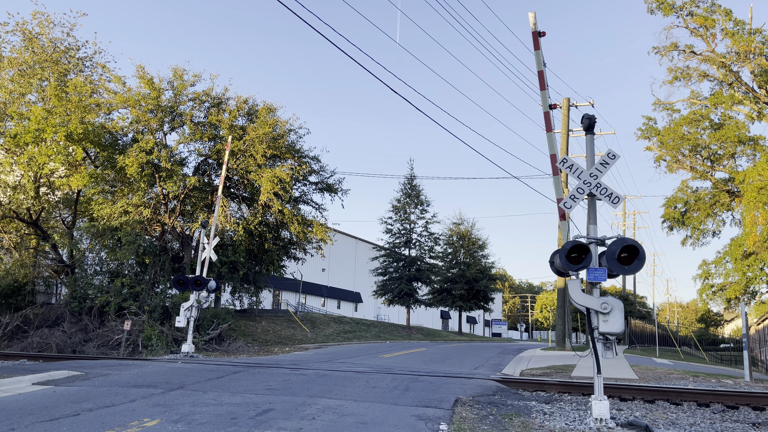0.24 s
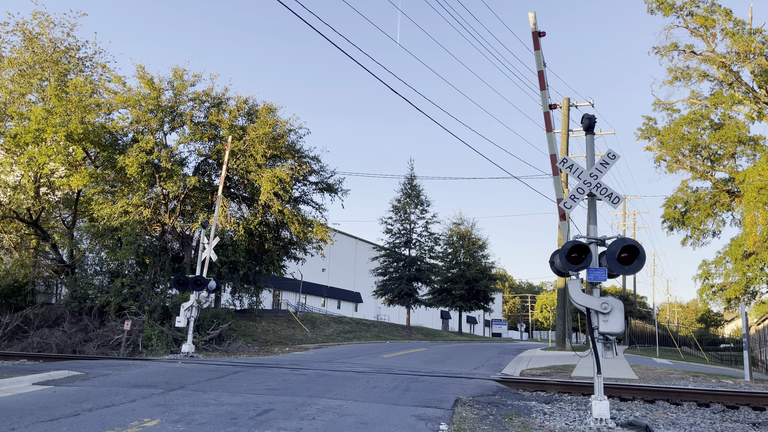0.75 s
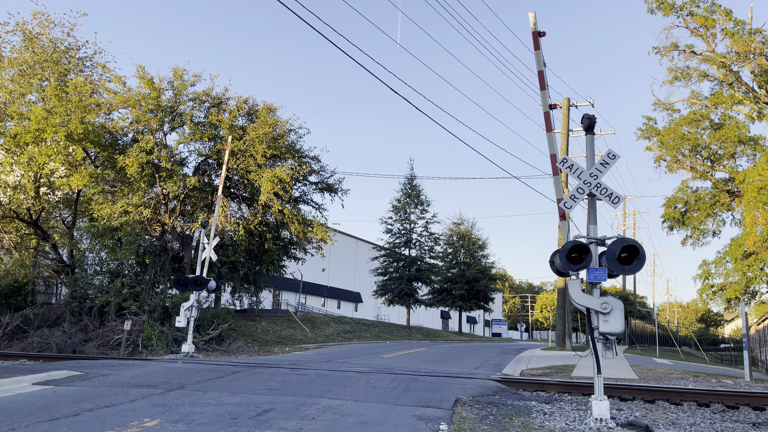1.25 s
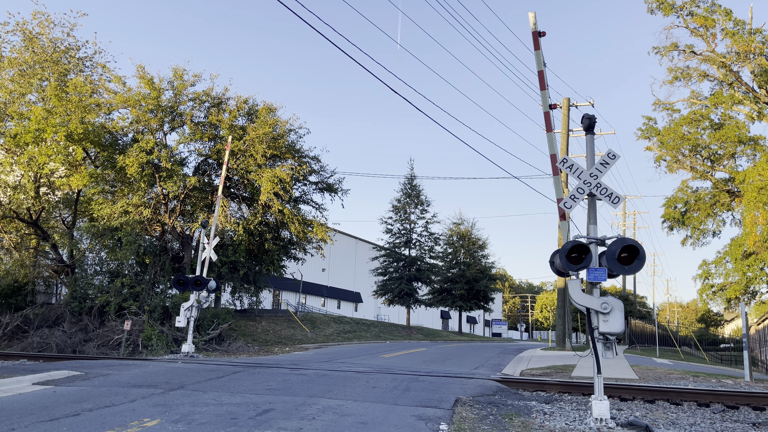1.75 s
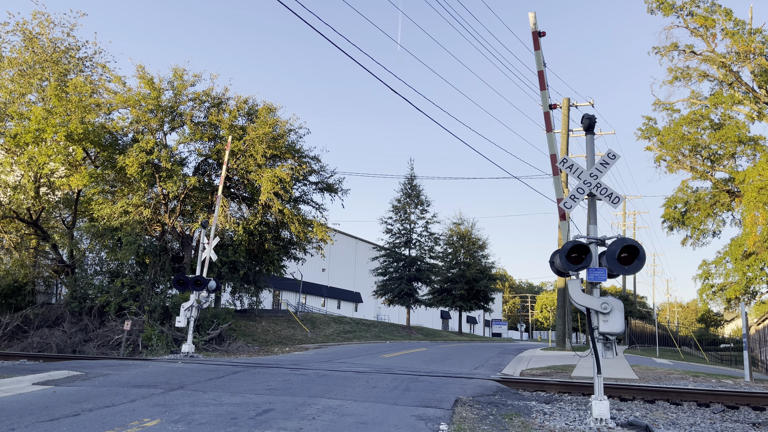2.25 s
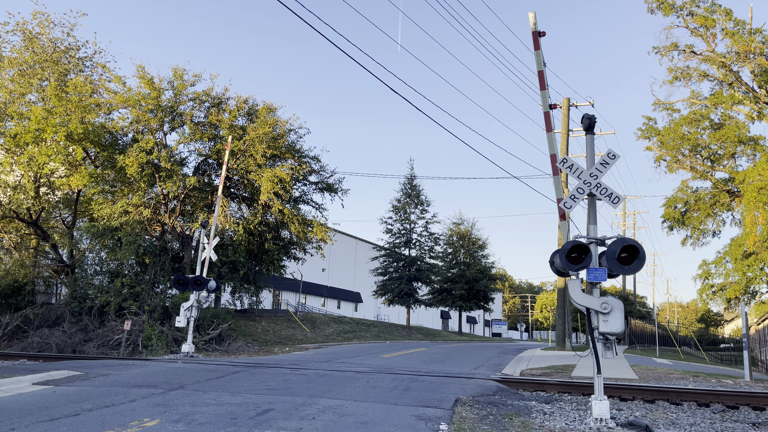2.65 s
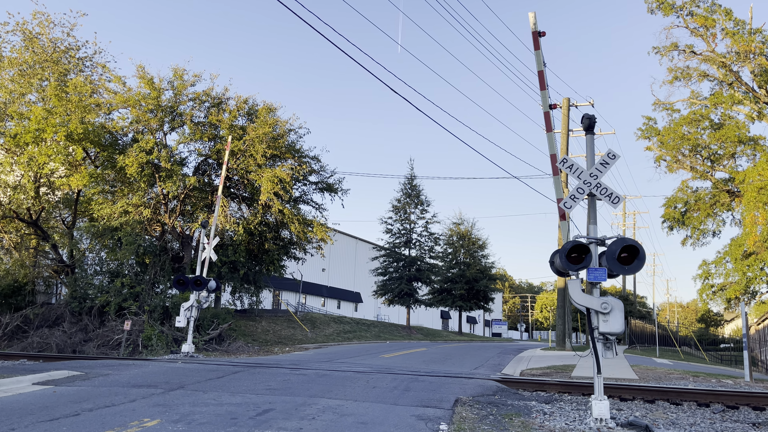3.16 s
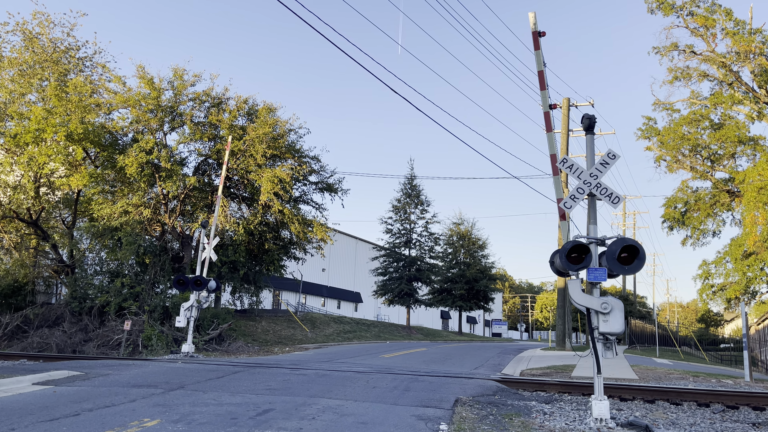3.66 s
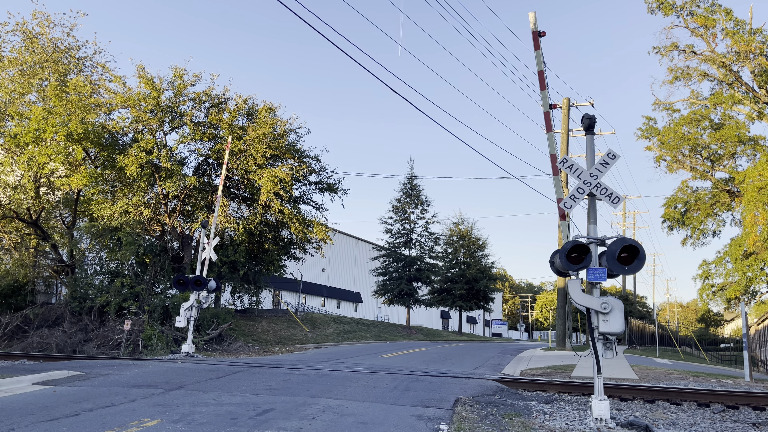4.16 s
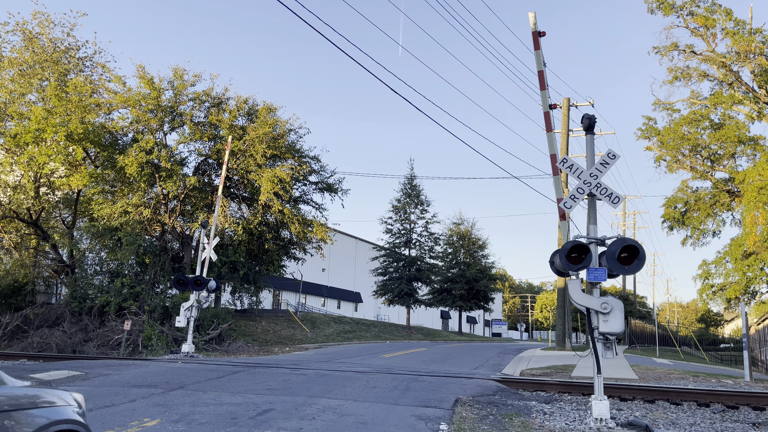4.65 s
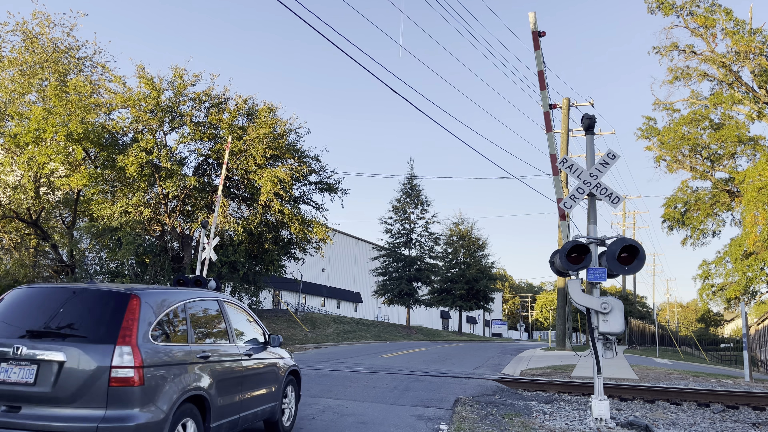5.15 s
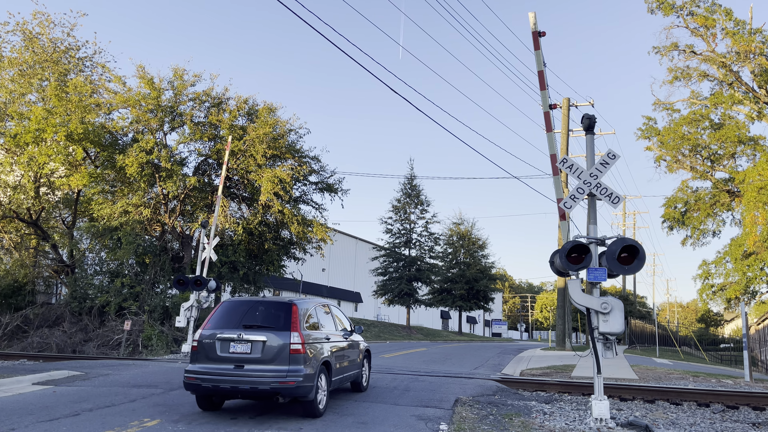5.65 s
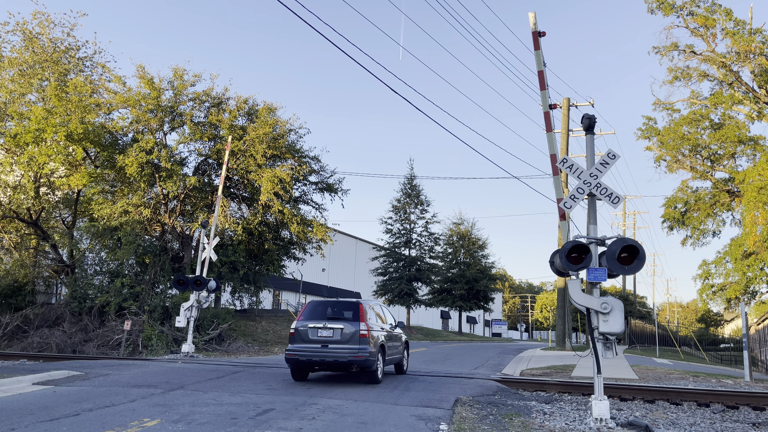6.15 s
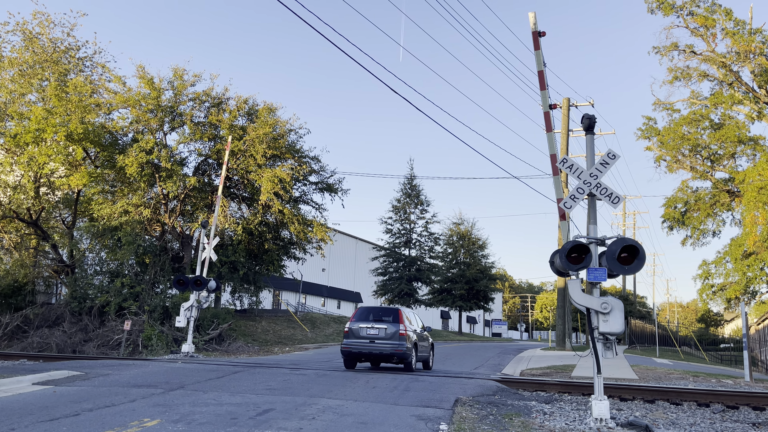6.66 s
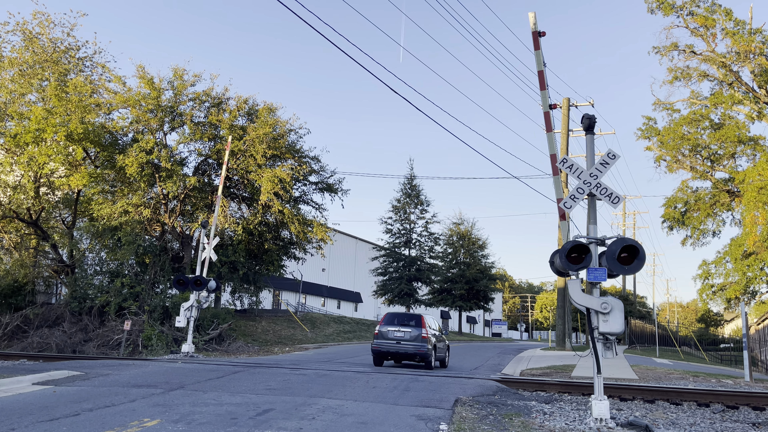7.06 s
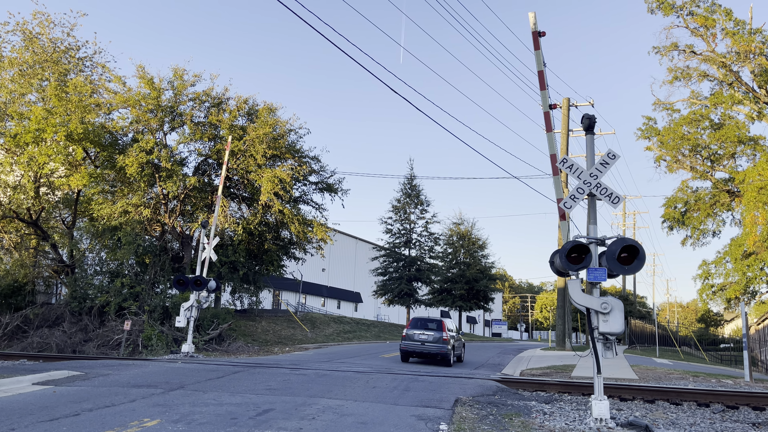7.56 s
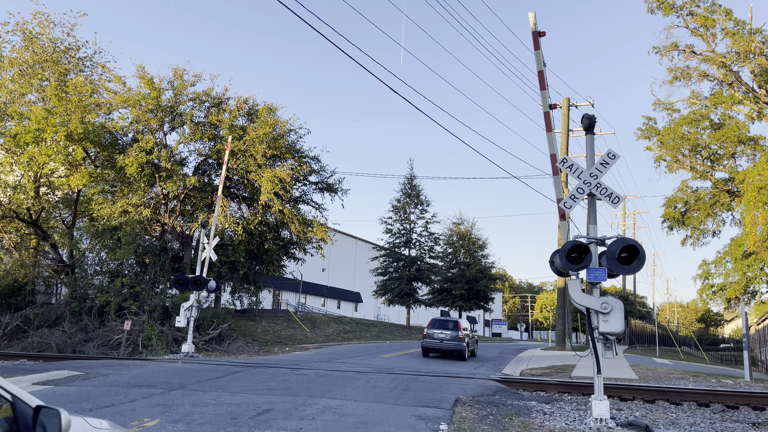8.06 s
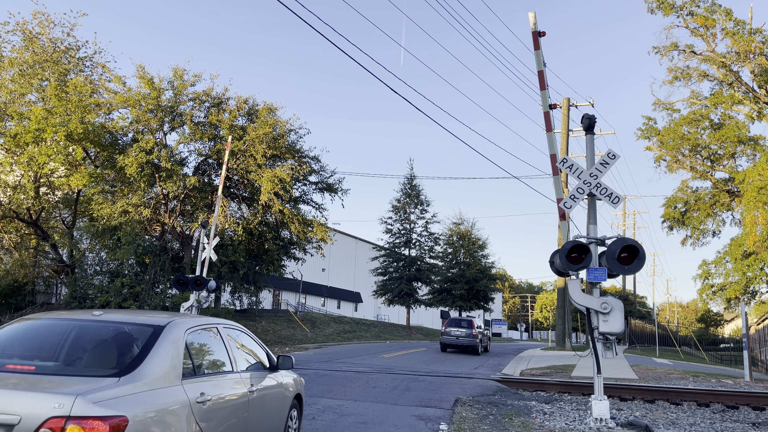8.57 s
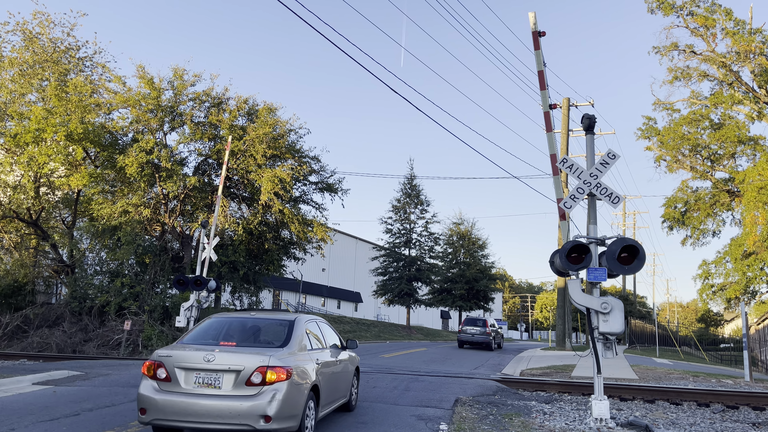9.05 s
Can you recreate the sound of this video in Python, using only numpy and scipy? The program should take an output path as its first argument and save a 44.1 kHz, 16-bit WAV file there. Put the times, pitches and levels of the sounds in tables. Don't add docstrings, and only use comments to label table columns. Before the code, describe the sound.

Low engine hum and distant road wash; a car roars by and clatters across railway tracks, a second follows as a bird chirps.

```python
import sys
import numpy as np
from scipy import signal
from scipy.fft import rfft, irfft, next_fast_len
from scipy.io import wavfile

SR = 44100
rng = np.random.default_rng(int(sys.argv[2]) if len(sys.argv) > 2 else 0)


def natural_amplitude(level_db):
    exponent = np.asarray(level_db, float) / 20
    return 10 ** exponent


def put_to_file(sound):
    columns = np.atleast_2d(sound).T
    safe = np.clip(columns, -1, 1)
    whole_steps = np.round(safe * 32767)
    wavfile.write(sys.argv[1], SR, whole_steps.astype(np.int16))


N = 410571
T, SIZE = np.arange(N) / SR, next_fast_len(N)
HZ = np.fft.rfftfreq(SIZE, 1 / SR)

# (frequency [Hz], density [dB per Hz])
FAR_COLOUR = [(45, 8), (160, -11.5), (350, -14), (600, -18), (900, -14), (1650, -18), (2200, -24.5),
              (4000, -39), (5400, -46), (6500, -46), (8200, -58.5), (10000, -60), (11200, -59),
              (12300, -63)]
BEHIND_COLOUR = [(45, 20.5), (160, -2), (350, -3.5), (600, -4.5), (900, 0.5), (1650, -5), (2150, -20),
                 (2650, -29), (3400, -28), (5300, -33), (6600, -33.5), (9000, -44), (11000, -46),
                 (11700, -57), (12000, -78)]
ABEAM_COLOUR = [(45, 18), (160, -6.5), (350, -8.5), (600, -12), (900, 0.5), (1650, -8), (2200, -22),
                (3300, -33), (5000, -31), (6500, -34), (8500, -43), (11000, -45), (11800, -46),
                (12500, -51.5)]
AHEAD_COLOUR = [(45, 12), (160, -5), (350, -9), (600, -14.5), (900, -7.5), (1650, -9.5), (2200, -24.5),
                (4000, -35), (5500, -26.5), (6500, -31.5), (8300, -41), (11000, -45), (11750, -57),
                (12100, -57)]
# (frequency [Hz], left leads [rad], likeness [0-1], left over right [dB])
FAR_PORTS = [(45, .1, .99, 1.6), (350, .8, .6, 2.5), (600, 2.6, .55, 4), (900, 1.8, .22, 4.5),
             (1500, 1.8, .55, 1), (2300, 3.1, .3, 2.5), (3000, 3.8, .48, 4), (4400, 5.8, .45, 7),
             (5200, 8.8, .07, 10), (6300, 8.8, .25, 13), (8700, 0, .2, 11), (9700, 0, .65, 1),
             (10200, 0, .88, 0), (11400, 0, .7, 0)]
BEHIND_PORTS = [(45, .1, .99, 1.8), (350, 1.8, .75, 4.3), (700, 2.6, .88, 4.7), (1200, 3.1, .75, 7),
                (1600, 2.8, .4, 6), (2050, 3.6, .25, 4), (2600, 6, .45, 2.5), (3600, 8.8, .55, 4),
                (4400, 10.2, .3, 5), (5300, 11.3, .35, 5), (6500, 17, .08, 11), (8500, 0, .4, 10),
                (9200, 0, .6, 1), (10000, 0, 1, 0), (11400, 0, .85, .5)]
ABEAM_PORTS = [(45, .1, .99, 1.6), (350, .9, .78, 5), (700, 2.1, .8, 7), (950, 2.2, .62, 5.5),
               (1250, 2.9, .82, 3), (1550, 2.8, .15, 5.5), (2250, 4, .62, 1.5), (2900, 4.2, .2, 5),
               (3400, 7.2, .3, 4), (5100, 6.3, .08, 12), (6600, 7, .3, 11), (8000, 0, .45, 2.5),
               (8800, 0, .85, 1), (10000, 0, 1, 0), (11400, 0, .87, .5)]
AHEAD_PORTS = [(45, .1, .99, 1.6), (350, .4, .78, 2.6), (650, .6, .25, 5), (950, .9, .52, 3),
               (1250, 1.2, .3, 6.5), (1600, .9, .68, 2), (1850, 1.8, .6, -1.5), (2250, 1.8, .25, 3),
               (2600, 1.8, .6, .5), (4000, 4.5, .1, 4.5), (5400, 9.6, .47, 10), (6100, 11, .1, 9),
               (8200, 0, .55, 3), (8800, 0, .92, 1), (10000, 0, 1, 0), (11400, 0, .87, .3)]
# (frequency [Hz], left leads [rad])
TREBLE_LEAD = [(6200, 2.2), (6600, .3), (7050, -np.pi), (7700, -5.6), (8700, -6.6), (9850, -3 * np.pi),
               (10330, -3 * np.pi), (11700, -4 * np.pi)]
# (frequency [Hz], width [Hz], depth [dB])
HOUSING_DIPS = [(1120, 59, -3), (1933, 410, -7), (4120, 440, -4.5), (5270, 170, -2.5)]

# (time [s], bearing [-1 far off, 0 behind, 1 abeam, 2 ahead], closeness [dB])
NEAREST_CAR = [(0, -1.1, -11.5), (2.0, -0.86, -11.5), (2.8, -0.46, -9), (3.4, 0.07, -4.5),
               (3.8, -0.3, -1.5), (4.2, 0.53, 0), (4.45, 0.5, 1), (4.7, 1.26, 0.4), (5.2, 1.7, -1.2),
               (5.7, 2, -2.5), (6.3, 1.76, -3.5), (6.7, 1.05, -3.5), (7.0, 0.14, -3), (7.6, 0.22, 1),
               (8.05, 0.9, 1.14), (8.5, 1.73, -1), (8.9, 2.5, -3), (9.31, 2.33, -4)]
LAYER_EDGES_HZ = [180, 650, 1900, 4200, 10100]
# (share of the closeness swing, far off [dB], behind [dB], abeam [dB], ahead [dB])
RUMBLE, ROAR = (0.1, -42.5, -42.5, -39, -41), (0.6637, -40.5, -44.5, -38.5, -41)
TREAD, WASH = (0.83, -37.5, -42.5, -42, -41.5), (0.9151, -53, -50, -50, -52.5)
HISS, FIZZ = (0.69, -63, -57, -57, -62), (4, -83, -66.5, -53, -51.5)

# (time [s], peak level [dB], pitch [Hz])
RAIL_THUMPS = [(5.58, -30, 404), (5.603, -25.5, 179), (5.626, -25, 105), (5.925, -26, 179),
               (5.987, -33, 153), (6.207, -22.5, 209), (6.244, -21, 207), (6.2562, -15, 120),
               (6.274, -29, 121), (6.2892, -18.5, 108), (6.325, -25, 100), (6.437, -20, 115),
               (6.489, -21.5, 117), (6.583, -25, 170), (6.6099, -18, 170), (6.666, -21, 94.5),
               (6.7968, -19.5, 160), (6.834, -21.5, 93)]
# (time [s], peak level
# [dB], pitch [Hz])
PANEL_KNOCKS = [(5.58, -30, 800), (5.58, -27, 1380), (5.937, -32, 620), (5.611, -32, 1420),
                (5.595, -31, 850), (6.425, -32, 1400), (5.581, -32, 520), (6.2045, -27.5, 1500),
                (6.2045, -26, 850), (6.22, -29, 1250), (6.246, -27.5, 1550), (6.2482, -23, 800),
                (6.239, -32, 870), (6.2797, -25.5, 900), (6.572, -34, 280), (6.213, -32, 250),
                (6.417, -30, 1550), (6.419, -22.5, 410), (6.441, -23.5, 330), (6.486, -27, 855),
                (6.486, -35, 1750), (6.495, -28, 1420), (6.493, -27, 290), (6.566, -24.5, 335),
                (6.581, -27.5, 1330), (6.6068, -27, 1500), (6.6065, -21, 418), (6.61, -27, 760),
                (6.637, -24, 438), (6.638, -31, 1300), (6.783, -23, 397), (6.799, -33, 495),
                (6.806, -33, 1450), (6.851, -30, 860), (6.805, -27, 330), (6.853, -24.5, 270),
                (9.2538, -24, 1300), (9.2538, -33, 746)]
# (time [s], firing rate [Hz], first order level [dB])
FIRST_CAR_ENGINE = [
    (2.6, 41.5, -60),
    (3.3, 41, -52),
    (4.0, 40, -51),
    (4.5, 38.5, -43),
    (5.0, 37, -44),
    (6.1, 35, -53),
    (6.6, 33.5, -55),
    (7.3, 30, -59),
    (7.7, 29, -72),
]
SECOND_CAR_ENGINE = [
    (7.0, 37.3, -88),
    (7.6, 32.9, -43),
    (8.1, 32.1, -45),
    (8.6, 31.25, -43.5),
    (9.31, 29.1, -59),
]

# (time [s], length
# [s], frequency [Hz], width [Hz], level [dB])
WAKES = [(3.9, 0.35, 1620, 280, -49.5), (4.45, 0.32, 2300, 450, -48), (4.45, .4, 3250, 420, -59),
         (4.4, 0.16, 900, 240, -48), (4.55, 0.58, 1680, 270, -47.5), (5.15, 0.72, 1450, 210, -44),
         (4.9, 0.62, 870, 240, -44), (4.8, 0.12, 860, 170, -48), (7.25, 0.23, 1620, 250, -47.5),
         (6.9, 0.19, 850, 160, -45), (7.6, 0.28, 2350, 430, -52), (7.8, 0.32, 3100, 370, -56),
         (7.79, .2, 1100, 250, -46), (5.65, .2, 880, 200, -53), (8.05, 0.23, 870, 180, -51),
         (8.4, 0.28, 950, 120, -47), (8.15, 0.41, 1720, 290, -48.5), (8.6, 0.39, 1500, 180, -51),
         (7.85, 0.24, 160, 9.1, -44.5), (7.6, 0.62, 78, 5.4, -43.5), (7.1, .25, 11200, 900, -69),
         (4.6, .3, 3200, 500, -60), (9.1, .4, 2350, 300, -61), (8.25, 0.28, 330, 100, -50),
         (8.9, 0.73, 11300, 1200, -66)]
# (time [s], length [s], frequency [Hz], width [Hz], level [dB])
BEAMS = [(3.9, .4, 6600, 500, -60), (4.1, .4, 4400, 500, -60), (4.75, .4, 5000, 400, -63),
         (4.55, .2, 450, 170, -48), (7.3, .45, 6600, 500, -60), (7.4, .3, 3400, 500, -58),
         (7.75, .25, 580, 150, -43), (8.05, .5, 5200, 450, -59), (4.13, .15, 1020, 200, -47),
         (4.45, .2, 930, 220, -45), (7.5, .3, 900, 250, -46), (7.8, .25, 1150, 300, -45)]
# (time [s], length [s], frequency [Hz], width [Hz], level
# [dB])
GLANCES = [(2.75, .4, 700, 220, -52), (1.75, 0.36, 650, 250, -53), (3.1, .3, 3350, 400, -60),
           (3.75, .2, 5100, 500, -64), (4.25, .3, 2000, 300, -51), (4.7, 0.27, 4350, 600, -61),
           (4.75, .35, 4200, 500, -60), (4.68, .08, 3100, 400, -54), (5.45, .35, 750, 250, -49),
           (7.1, .3, 1850, 230, -53), (7.3, .25, 88, 11, -43), (7.55, 0.36, 152, 22, -47.5),
           (7.72, 0.16, 520, 145, -45), (7.91, .1, 520, 200, -42), (7.7, .4, 1950, 350, -49),
           (9, .12, 3000, 700, -57), (8.95, .7, 2300, 230, -58.5), (7.07, 0.22, 280, 68, -49),
           (6.58, .15, 400, 170, -46), (6.5, .15, 150, 55, -45), (3.78, .2, 10900, 700, -76),
           (7.4, .15, 2150, 250, -54), (7.85, .25, 3500, 500, -60), (4.4, .15, 2100, 250, -53),
           (5.65, .3, 850, 300, -50), (7.12, .25, 3600, 400, -63), (8.0, .6, 12100, 500, -80),
           (9, .12, 65.3, 5.3, -39)]

# (time [s], peak level [dB])
STONE_SNAPS = [
    (2.028, -23),
    (2.546, -37),
    (2.569, -22),
    (3.633, -27),
    (3.745, -28),
    (3.751, -22),
    (4.971, -52),
    (8.291, -21),
]
# (time [s], peak level [dB], pitch [Hz])
GRIT_TICKS = [(0.4015, -45.5, 6760), (0.5584, -58, 8200), (0.4045, -50, 5600), (0.403, -56, 9000),
              (2.5474, -56, 7770), (5.896, -34, 11100), (5.9918, -44, 11000), (6.5485, -48, 6090),
              (6.5964, -49, 5680), (6.013, -44, 11300), (6.188, -50, 8500), (6.192, -43, 11000),
              (6.198, -45, 11500), (6.432, -47, 10600), (6.549, -43, 11200), (6.811, -47, 11300)]
# (time [s], length [s], level [dB], centre [Hz])
GRIT_SPRAYS = [
    (0.218, 0.056, -63, 5470),
    (.25, 0.061, -76, 10000),
    (6.013, 0.019, -55, 11000),
    (6.192, .02, -52, 11000),
    (6.435, 0.029, -57, 10600),
    (6.815, 0.026, -59, 11000),
]

# (time [s], level [dB])
DIESEL_LEVEL = [(0, -45), (.9, -43), (1.4, -38.5), (1.75, -41.5), (2.1, -39.5), (3.0, -39.5), (3.3, -42.5),
                (3.9, -36), (4.8, -37), (5.4, -40.5), (5.75, -37), (6.3, -35.5), (6.8, -42.5), (7.8, -43.5),
                (8.1, -36.5), (8.3, -40.5), (8.55, -37.5), (9.31, -43)]
# (multiple of the base rate, level [dB], fade [dB/s])
DIESEL_ORDERS = [(1, -18, 0), (2, 0, 0), (3, -3, 1.3), (4, -10, .5), (5, -7, 1.5)]
# (time [s], length [s], start pitch [Hz], end pitch [Hz], level [dB])
BIRD_CHIRPS = [
    (8.538, .032, 2600, 3170, -54),
    (8.81, .022, 3900, 2950, -54),
    (8.862, .04, 2500, 3140, -53),
    (9.121, .03, 4000, 2780, -54),
    (9.174, .032, 2450, 3110, -50),
]
# (frequency [Hz], level [dB rms], fade [dB/s])
PLANT_HUMS = [(45.8, -54, 1.5), (69.4, -51, 0.5), (87.2, -46.5, 1), (103, -55, 0.5), (137.7, -49, 2),
              (170, -53, 3)]


def rms_one(x):
    return x / np.sqrt(np.mean(np.mean(np.atleast_2d(x), axis=0) ** 2) + 1e-20)


def in_time(rows):
    s, *columns = np.transpose(rows)
    return [np.interp(T, s, c) for c in columns]


def drift(rate):
    r = np.exp(-128 * np.pi * rate / SR)
    slow = signal.lfilter([1], [1, -2 * r, r * r], rng.standard_normal(N // 64 + 2002))[2000:]
    return np.interp(np.arange(N) / 64, np.arange(len(slow)), slow / slow.std())


def add(out, s, sound):
    i = max(round(s * SR), 0)
    out[i:i + len(sound)] += sound[:N - i]


def band_noise(low_hz, high_hz, shape):
    band = signal.butter(2, [low_hz, high_hz], "band", fs=SR, output="sos")
    return signal.sosfilt(band, rng.standard_normal(shape))


def ring(hz, t60, rise_s, sag=0):
    t = T[:round(.12 * SR)]
    turns = hz * (t + sag * 0.0031 * (1 - np.exp(-t / 0.0022)))
    wave = (1 - np.exp(-t / rise_s)) * natural_amplitude(-60 * t / t60) * np.sin(2 * np.pi * turns)
    return wave / abs(wave).max()


def tone(hz, wander_hz, wobble_db):
    phase = 2 * np.pi * np.cumsum(hz + wander_hz * drift(2.46)) / SR + rng.uniform(0, 2 * np.pi)
    return np.sqrt(2) * natural_amplitude(wobble_db * drift(5.3)) * np.sin(phase)


def dip(hz, width, db):
    return natural_amplitude(db / (1 + ((HZ - hz) / width) ** 2))


def ports(bearing, sound, scattered):
    hz, lead, alike, pan_db = np.transpose(bearing)
    treble_lead = np.interp(HZ, *np.transpose(TREBLE_LEAD))
    lead = np.where(HZ < TREBLE_LEAD[0][0], np.interp(HZ, hz, lead), treble_lead)
    alike = np.interp(HZ, hz, alike) ** 0.79
    pan = natural_amplitude(-np.interp(HZ, hz, pan_db))
    left = sound * dip(hz=7050, width=115, db=-8.5)
    right = pan * (alike * sound * np.exp(-1j * lead) + np.sqrt(1 - alike ** 2) * scattered)
    return np.array([left, right]) / np.sqrt(1 + pan ** 2)


def heard(bearing, sound):
    spectrum = rfft(sound, SIZE)
    late = spectrum * np.exp(-2j * np.pi * HZ * 0.00365)
    return irfft(ports(bearing, spectrum, late), SIZE)[:, :N]


def road_noise(colour, bearing):
    hz, level_db = np.transpose(colour)
    low_cut = HZ ** 3 / (HZ ** 3 + 72.4 ** 3)
    gain = natural_amplitude(np.interp(np.log(HZ + 1), np.log(hz), level_db)) * low_cut
    gain *= np.prod([dip(*row) for row in HOUSING_DIPS], axis=0)
    return ports(bearing, *(rfft(rng.standard_normal((2, SIZE))) * gain))


def cars():
    turn, close_db = in_time(NEAREST_CAR)
    turn = np.clip(turn, -1, 2)
    flutter = []
    for swing, *bearing_db in (RUMBLE, ROAR, TREAD, WASH, HISS, FIZZ):
        level_db = swing * close_db + np.interp(turn, np.arange(-1, 3), bearing_db)
        flutter.append(natural_amplitude(level_db + 0.96 * drift(42)))
    below = [0 * HZ] + [1 / (1 + (HZ / edge) ** 22) for edge in LAYER_EDGES_HZ] + [1 + 0 * HZ]
    bearings = [(FAR_COLOUR, FAR_PORTS), (BEHIND_COLOUR, BEHIND_PORTS),
                (ABEAM_COLOUR, ABEAM_PORTS), (AHEAD_COLOUR, AHEAD_PORTS)]
    out = np.zeros((2, N))
    for k, bearing in enumerate(bearings):
        share = np.sqrt(np.clip(1 - abs(turn + 1 - k), 0, 1))
        noise = road_noise(*bearing)
        for low, high, gain in zip(below, below[1:], flutter):
            layer = irfft(noise * np.sqrt(np.maximum(high - low, 0)), SIZE)[:, :N]
            out += share * gain * rms_one(layer)
    return out


def rail_thumps():
    out, shake = np.zeros(N), np.zeros(N)
    for s, peak_db, hz in RAIL_THUMPS:
        t60 = 0.036 * (110 / hz) ** 0.46
        add(out, s, -natural_amplitude(peak_db) * ring(hz, t60, 0.0029, sag=0.2))
        add(shake, s, natural_amplitude(peak_db - 17.5 - 60 * T[:SR // 5] / 0.1))
    t = T[:SR // 10]
    boom_db = -21 - 60 * np.maximum(t - 0.048, 0) / 0.033
    add(out, 6.6155, -natural_amplitude(boom_db) * np.sin(2 * np.pi * 104.4 * t))
    return out + shake * rms_one(band_noise(140, 520, N))


def panel_knocks():
    out = np.zeros(N)
    crack = natural_amplitude(-12.5) * ring(2190, 0.0038, .0003)
    for s, knock_db, hz in PANEL_KNOCKS:
        add(out, s, natural_amplitude(knock_db) * (ring(hz, 17.4 / (hz + 270.0), 0.00078) + crack))
    return out


def car_engines():
    out = np.zeros(N)
    # order, upper over first [dB], rise [dB/s]
    for car, order, upper_db, rise in ((FIRST_CAR_ENGINE, 3, 3, 1.4), (SECOND_CAR_ENGINE, 2.5, -31.5, 18.5)):
        firing, first_db = in_time(car)
        start, end = car[0][0], car[-1][0]
        near = (T > start) & (T < end)
        upper = natural_amplitude(upper_db + rise * np.clip(T - start, 0, end - start))
        out += near * natural_amplitude(first_db) * (tone(firing, 0.66, 0.73) + upper * tone(order * firing, 0.44, 0.17))
    return out


def tyre_hum():
    cavity_hz, width_hz, level_db, from_s = 257.5, 42, -50.5, 6.9
    swell_db, swell_s, swell_length_s = 3.5, 8.4, 0.17
    resonance = 1 / (1 + ((HZ - cavity_hz) / (width_hz / 2)) ** 2)
    hum = rms_one(irfft(rfft(rng.standard_normal(SIZE)) * resonance, SIZE)[:N])
    swell = swell_db * np.exp(-.5 * ((T - swell_s) / (swell_length_s / 2)) ** 2)
    return natural_amplitude(level_db + swell) * np.clip(10 * (T - from_s), 0, 1) * hum


def whooshes(rows):
    sag_per_s = .15
    out, t = np.zeros(N), T[:2 * SR] - 1
    for s, length, hz, width, db in rows:
        narrow = signal.butter(2, width / 2, fs=SR, output="sos")
        re, im = signal.sosfilt(narrow, rng.standard_normal((2, 2 * SR)))
        phase = 2 * np.pi * hz * (t - sag_per_s * t ** 2 / 2)
        sound = rms_one(re * np.cos(phase) + im * np.sin(phase))
        add(out, s - 1, natural_amplitude(db) * np.exp(-.5 * (2 * t / length) ** 2) * sound)
    return out


def stone_snaps():
    out = np.zeros(N)
    for s, peak_db in STONE_SNAPS:
        add(out, s, natural_amplitude(peak_db - 4.0) * ring(910, 0.011, 0.0002))
    return out


def grit():
    out = np.zeros(N)
    for s, peak_db, hz in GRIT_TICKS:
        add(out, s, natural_amplitude(peak_db) * (ring(hz, 0.0032, 0.00013) + 0.86 * ring(0.92 * hz, 0.0039, .0002)))
    for s, length, db, hz in GRIT_SPRAYS:
        puff = rms_one(band_noise(0.85 * hz, 1.1 * hz, SR // 4))
        swell = np.exp(-.5 * ((T[:SR // 4] - .125) / (length / 2)) ** 2)
        add(out, s - .125, natural_amplitude(db) * puff * swell)
    return out


def diesel():
    base_hz = 30.45
    level_db, = in_time(DIESEL_LEVEL)
    orders = sum(natural_amplitude(db - fade * T) * tone(k * base_hz, 0.069 * k, 1.0) for k, db, fade in DIESEL_ORDERS)
    return natural_amplitude(level_db) * orders


def bird():
    out = np.zeros(N)
    for s, length, start_hz, end_hz, db in BIRD_CHIRPS:
        u = np.linspace(0, 1, round(length * SR))
        hz = start_hz + (end_hz - start_hz) * (1 - (1 - u) ** 2.6)
        add(out, s, natural_amplitude(db) * np.sqrt(np.sin(np.pi * u)) * np.sin(2 * np.pi * np.cumsum(hz) / SR))
    return out


def plant_hums():
    return sum(natural_amplitude(db - fade * T) * tone(hz, 0.38, 1.2) for hz, db, fade in PLANT_HUMS)


def wind():
    level_db, gust_db = -53.5, 3.5
    both, left, right = band_noise(15, 45, (3, N))
    return natural_amplitude(level_db + gust_db * drift(6.0)) * rms_one(both + .25 * np.array([left, right]))


def scene():
    crossing = rail_thumps() + panel_knocks() + grit()
    ahead = crossing + car_engines() + tyre_hum() + whooshes(WAKES) + diesel() + plant_hums()
    near = heard(AHEAD_PORTS, ahead + whooshes(GLANCES))
    near += heard(ABEAM_PORTS, whooshes(BEAMS)) + heard(BEHIND_PORTS, stone_snaps())
    return cars() + np.sqrt(2) * near + bird() * np.array([[1.], [-1.]]) + wind()


def band_limit(x):
    return signal.sosfilt(signal.butter(12, 12910, fs=SR, output="sos"), x)


def record(dry):
    treble_cut = signal.cheby2(10, 45, 12190 + 550, fs=SR, output="sos")
    hiss = natural_amplitude(-100) * rng.standard_normal(dry.shape)
    return band_limit(signal.sosfilt(treble_cut, dry) + hiss)


dry = scene()
out = record(dry)
put_to_file(out)
```